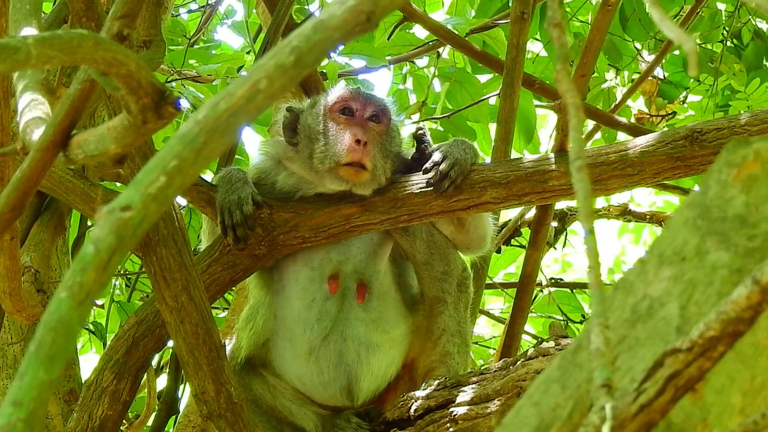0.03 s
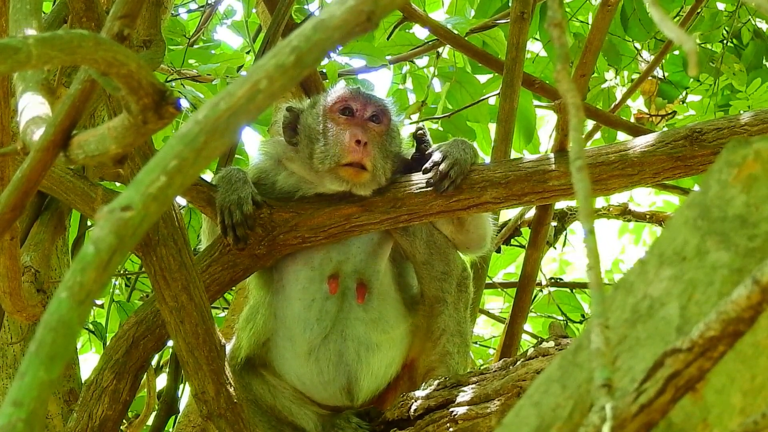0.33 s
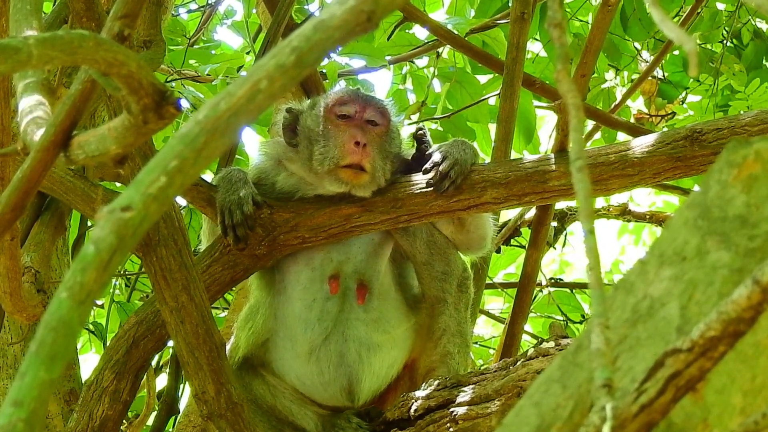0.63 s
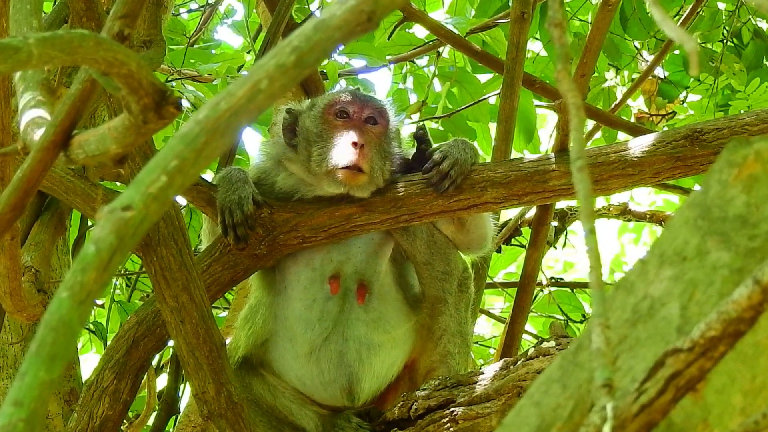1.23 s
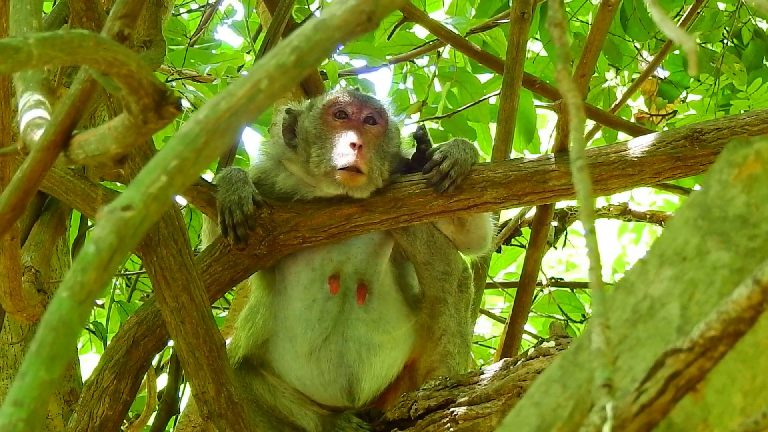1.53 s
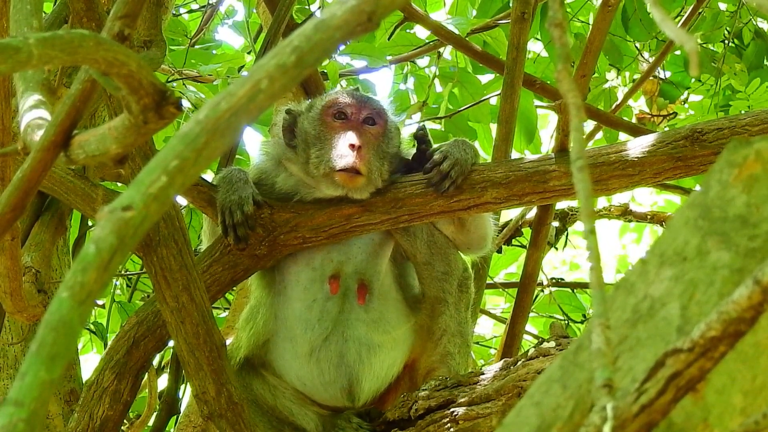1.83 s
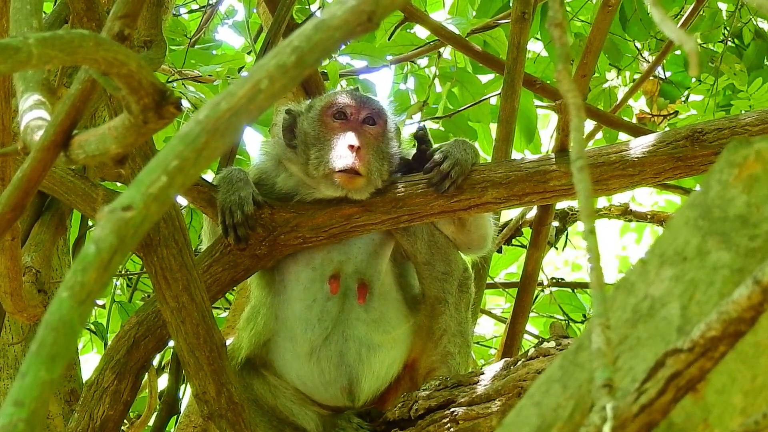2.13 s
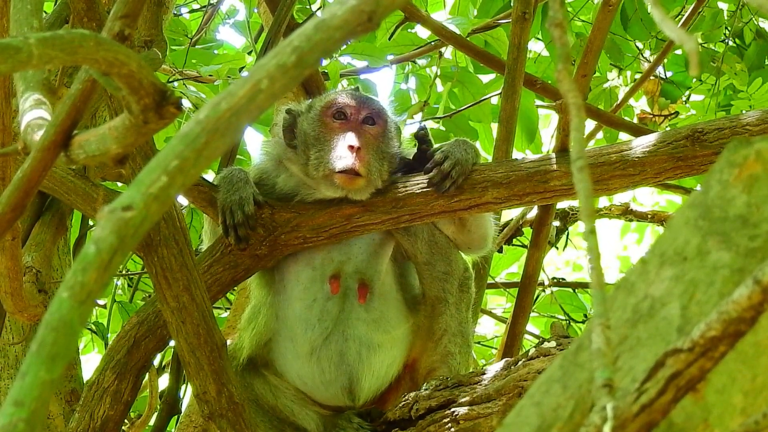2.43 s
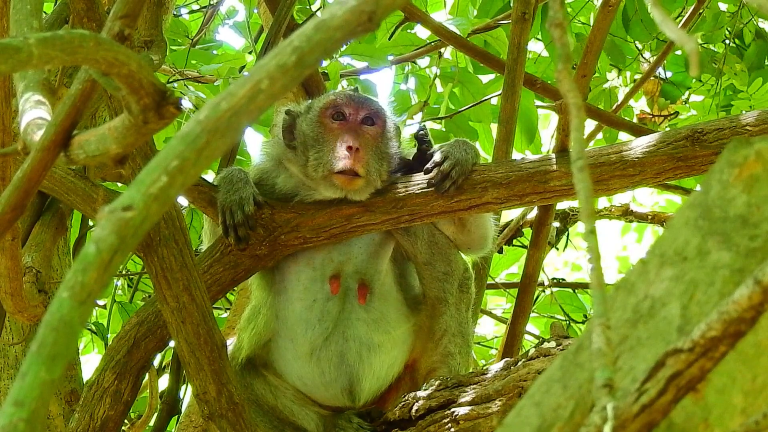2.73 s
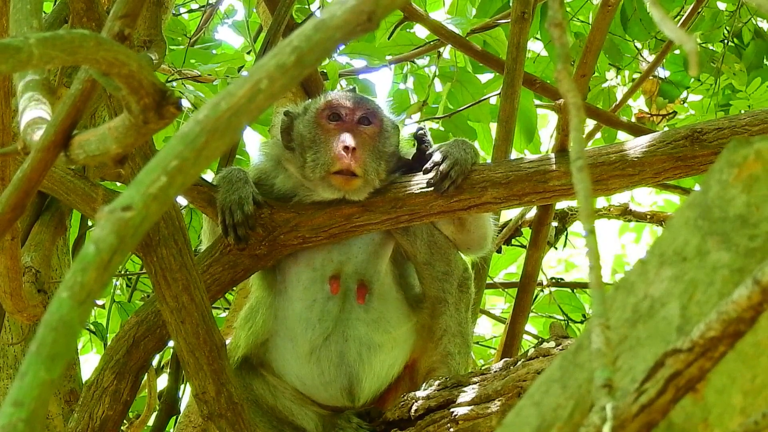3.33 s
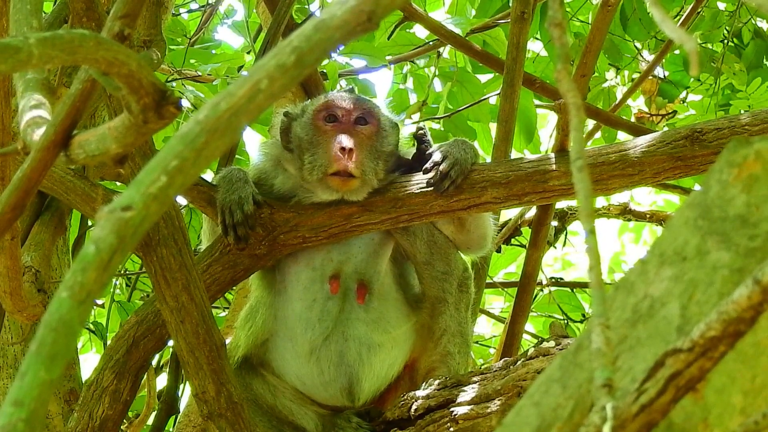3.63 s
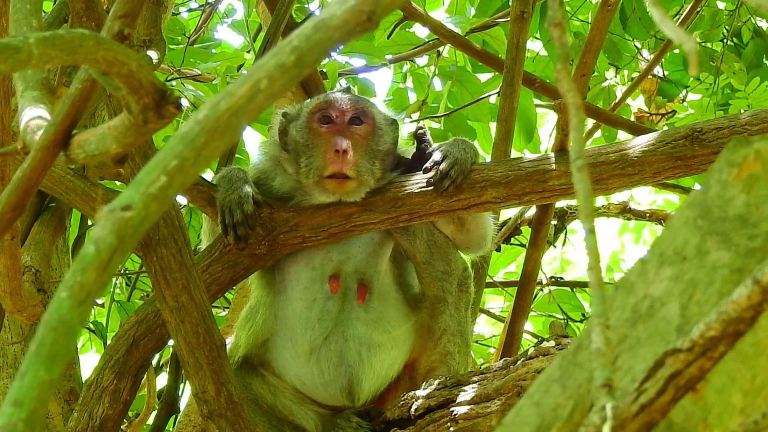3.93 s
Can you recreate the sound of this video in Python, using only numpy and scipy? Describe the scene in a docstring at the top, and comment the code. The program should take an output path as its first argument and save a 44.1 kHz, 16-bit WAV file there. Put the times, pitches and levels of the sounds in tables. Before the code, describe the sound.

A bird repeats a low two-note hoot about twice a second, echoing among trees. Further off, other birds chirp, scold and twice rattle harshly, while a thin insect whine, light leaf rustles and a low rumble surround the microphone.

```python
"""A low two-note hoot repeats among trees, each note an arch in pitch that trunks and canopy throw back.
Around the microphone lie a low outdoor rumble, the hiss of the woods and an insect's wavering whine.
Leaves rustle and twigs tick. Further off, a flock chirps and other birds scold in hoarse bands of
noise, rattle in quick harsh syllables and chatter in slurred notes."""
import sys
import numpy as np
from scipy import signal
from scipy.fft import rfft, irfft, next_fast_len
from scipy.io import wavfile
from scipy.ndimage import uniform_filter1d, map_coordinates

SR = 44100
rng = np.random.default_rng(int(sys.argv[2]) if len(sys.argv) > 2 else 0)


def log_audio(samples):
    """Write samples as a 16-bit WAV file to the path given in sys.argv[1]."""
    # one column per channel
    frames = np.atleast_2d(samples).T
    # limit to full scale, then quantise
    limited = np.clip(frames, -1, 1)
    pcm = np.round(limited * 32767).astype(np.int16)
    wavfile.write(sys.argv[1], SR, pcm)


N = 176400


def amp(db):
    """Decibels to gain."""
    return 10 ** (np.asarray(db) / 20)


def unit(x):
    """Scale to rms 1."""
    return x / np.sqrt(np.mean(x ** 2) + 1e-20)


def along(points, hz):
    """Read (freq_hz, value) points on a log frequency axis."""
    freqs, values = np.transpose(points)
    return np.interp(np.log(hz + 1), np.log(freqs + 1), values)


def clock():
    """Time of every sample in seconds."""
    return np.arange(N) / SR


def wobble(rate):
    """A smooth random curve, rate knots a second."""
    return map_coordinates(rng.standard_normal(int(N * rate / SR) + 4), [clock() * rate])


def filtered(x, response):
    """Shape x by a response of frequency."""
    size = next_fast_len(N + SR // 2)
    return irfft(rfft(x, size) * response(np.fft.rfftfreq(size, 1 / SR)), size)[..., :N]


def delayed(x, seconds):
    """The same sound arriving later."""
    return filtered(x, lambda hz: np.exp(-2j * np.pi * hz * seconds))


WOODS_PAN_DB = -1.4  # most of the wood sits a little right of the microphone
def pan(db):
    """Stereo gains for a level difference, left minus right."""
    return amp([[db / 2], [-db / 2]])


def phase(hz):
    """Running phase of a pitch curve."""
    return 2 * np.pi * np.cumsum(hz) / SR


# Decay under the trees: freq_hz, t60_s
CANOPY_DECAY = [(1000, 1), (2500, 0.85), (8000, 0.52)]
def canopy(x):
    """Leaves and branches scatter a diffuse stereo echo, returned as strong as x."""
    hz, t, spectrum = signal.stft(rng.standard_normal((2, SR)), SR, nperseg=256)
    decay = amp(-60 * t / along(CANOPY_DECAY, hz)[:, None])
    tail = signal.istft(spectrum * decay, SR, nperseg=256)[1]
    echo = signal.fftconvolve(x[None], tail, axes=1)[:, :N]
    return unit(echo) * np.std(x)


# Calls of the nearest bird: first_top_s, gap_s, second_gain_db
HOOT_PAIRS = [(.008, .13, -28.5), (0.4509, 0.14, -26.5), (0.9015, 0.13, -29), (1.3444, 0.12, -29),
              (1.7786, 0.13, -30), (2.2162, .119, -31), (2.6466, .123, -29.5), (3.0752, .119, -29.5),
              (3.497, 0.12, -30), (3.9222, .11, -29)]
# Arch of each note: from_top_ms, pitch_ratio, gain_db
FIRST_ARCH = [(-50, .6, -36.5), (-36, .74, -16), (-24, .79, -14.5), (-11, .861, -1), (-2.5, 1.029, -6.5),
              (3.5, .955, -4.5), (12.5, .832, -3.5), (26, .734, -12.5), (37.5, 0.645, -19.5)]
SECOND_ARCH = [(-38, 0.572, -26.5), (-24, .777, -9), (-9, .821, -5.5), (0, .902, -3.5), (8, .826, -12.5),
               (15, 0.779, -5.5), (29.5, 0.606, -30)]
# Throat colour on the overtone: freq_hz, gain_db
THROAT_COLOUR = [(2000, 2), (2450, -10.5)]
# Reflections from trunks to microphone: delay_ms, left_gain, right_gain
TRUNK_ECHOES = [(7.035, -0.45, -0.55), (11.236, -0.2, 0.31), (29.1, 0.18, 0.12), (43.97, 0.23, 0.084)]
def hoots(pitch_hz=1239, first_gain_db=-29.5, overtone_db=-27):
    """Pairs of arched, almost pure notes beat against their reflections from the trunks."""
    t, voice, overtone = clock(), np.zeros(N), np.zeros(N)
    for first_s, gap_s, second_gain_db in HOOT_PAIRS:
        notes = (first_s, FIRST_ARCH, first_gain_db), (first_s + gap_s, SECOND_ARCH, second_gain_db)
        for top_s, arch, note_db in notes:
            ms, ratio, arch_db = np.transpose(arch)
            from_top_ms = (t - top_s) * 1000
            on = (from_top_ms > ms[0]) & (from_top_ms < ms[-1])
            angle = phase(pitch_hz * rng.normal(1, 0.0074) * np.interp(from_top_ms[on], ms, ratio))
            swell = amp(np.interp(from_top_ms[on], ms, arch_db))
            voice[on] += amp(note_db) * swell * np.sin(angle)
            overtone[on] += amp(note_db + overtone_db) * swell ** .25 * np.sin(2 * angle)
    voice += filtered(overtone, lambda hz: amp(along(THROAT_COLOUR, hz)))
    trunks = sum(np.array([[left], [right]]) * delayed(voice, ms / 1000)
                 for ms, left, right in TRUNK_ECHOES)
    return pan(-1.5) * (voice + trunks + amp(-4.5) * canopy(voice))


# Likeness of the microphone's two sides: freq_hz, correlation
STEREO_LIKENESS = [(70, 0.99), (150, 0.9), (400, 0.38), (6000, 0.27)]
def noise(colour):
    """Stereo noise of rms 1, alike in the bass and mostly unrelated in the treble."""
    def mid_and_side(hz):
        turn = np.arccos(np.clip(along(STEREO_LIKENESS, hz), -1, 1)) / 2
        return amp(along(colour, hz)) * [np.cos(turn), np.sin(turn)]
    mid, side = filtered(rng.standard_normal((2, N)), mid_and_side)
    return unit(np.array([mid + side, mid - side]))


def patchy(x, drift_db=1.1):
    """Each region of the spectrum drifts slowly in level."""
    spectrum = signal.stft(x, nperseg=512)[2]
    across_pitch = uniform_filter1d(rng.standard_normal(spectrum.shape[1:]), size=10, axis=0)
    drift = unit(uniform_filter1d(across_pitch, size=28, axis=1))
    return signal.istft(spectrum * amp(drift_db * drift), nperseg=512)[1][:, :N]


# Colours of the rumble and the hiss: freq_hz, gain_db
RUMBLE_COLOUR = [(20, -23), (32, -16), (56, 2), (72, -9.5), (100, -15), (138, -8), (160, -16.5),
                 (400, -38.5), (3000, -115)]
HISS_COLOUR = [(1200, 1.5), (3500, -5), (5200, -0.5), (6800, -0.5), (8200, -12.5), (10500, -16.5),
               (15500, -19)]
# Course of the hiss: time_s, level_db
HISS_LEVEL = [(1.9, -57.5), (2.8, -57), (3.6, -59)]
def rumble_and_hiss(rumble_db=-43, swell_db=2):
    """A low distant rumble and the drifting hiss of the woods surround the microphone."""
    rumble = amp(rumble_db + swell_db * wobble(6.32)) * noise(RUMBLE_COLOUR)
    hiss = amp(np.interp(clock(), *np.transpose(HISS_LEVEL))) * patchy(noise(HISS_COLOUR))
    return pan(WOODS_PAN_DB) * (rumble + hiss)


# Partials of the insect's whine: pitch_hz, swing_hz, level_db
WHINE_PARTIALS = [(7585, 117.8, -63.5), (7050, 62.4, -70.5)]
def insect(waver_hz=12.3, right_lag_s=0.00016):
    """A thin whine flips up and down in pitch, reaching the microphone more as echo than direct."""
    flips = np.tanh(2 * np.sin(phase(waver_hz * (1 + .2 * wobble(8)))))
    swing = flips + 0.258 * wobble(250)
    voice = sum(amp(db) * np.sin(phase(hz + swing_hz * swing)) for hz, swing_hz, db in WHINE_PARTIALS)
    direct = np.array([voice, delayed(voice, right_lag_s)])
    return pan(WOODS_PAN_DB) * (direct + amp(4.5) * canopy(voice))


# Course of the distant flock: time_s, level_db
FLOCK_LEVEL = [(.2, -56), (.8, -55.5), (1.2, -59.5), (2.05, -55.5), (3.7, -63)]
def flock(count=260, centre_hz=2226, log_spread=0.2472, chirp_s=0.01943):
    """Many gliding chirps, far off, blur into one another under the canopy."""
    chirps, progress = np.zeros(N + SR), np.linspace(0, 1, int(chirp_s * SR))
    for k, (jitter, pitch, glide) in enumerate(rng.uniform(-1, 1, (count, 3))):
        hz = centre_hz * np.exp(log_spread * (pitch + glide * (progress - .5)))
        start = int(abs(k + jitter) * N / count)
        chirps[start:start + len(progress)] += np.sin(np.pi * progress) * np.sin(phase(hz))
    level = amp(np.interp(clock(), *np.transpose(FLOCK_LEVEL)))
    return level * pan(WOODS_PAN_DB) * unit(.5 * chirps[:N] + canopy(chirps[:N]))


# Brushes of the leaves: start_s, level_db
LEAF_BRUSHES = [(0.133, -51.5), (.46, -55.5), (1.51, -53.5), (2.444, -55), (2.883, -46), (3.911, -53)]
# Colour of the leaves: freq_hz, gain_db
LEAF_COLOUR = [(4000, -6.5), (6600, 2), (9500, -14.5), (15000, -29)]
def leaves(rise_s=0.0036, t60_s=0.6, grain_db=2.5):
    """Brushed leaves send a short grainy hiss straight to the microphone."""
    t = clock()
    brush = sum(amp(db - 60 * np.abs(t - start_s) / t60_s) * np.clip((t - start_s) / rise_s, 0, 1)
                for start_s, db in LEAF_BRUSHES)
    grains = unit(noise(LEAF_COLOUR) * amp(grain_db * wobble(600)))
    return pan(-1.1) * brush * grains


# Scolding from off in the trees: middle_s, half_length_s, centre_hz, level_db
SCOLD_CALLS = [(0.768, 0.15, 2220, -50), (1.281, 0.037, 4230, -58), (1.387, .07, 3390, -54),
               (2.103, 0.035, 2670, -52.5), (3.2, 0.03, 3100, -54.5), (3.95, 0.095, 3380, -52)]
def scolds(log_width=0.15, flutter_hz=70, flutter_db=2.5):
    """Hoarse, fluttering bird calls, each a swell of noise in one resonance."""
    t, voice = clock(), np.zeros(N)
    flutter = amp(flutter_db * np.sin(phase(flutter_hz * (1 + 0.1974 * wobble(30)))))
    for middle_s, half_length_s, centre_hz, db in SCOLD_CALLS:
        resonance = lambda hz: np.exp(-.5 * (np.log((hz + 1) / centre_hz) / log_width) ** 2)
        band = filtered(rng.standard_normal(N), resonance)
        swell = amp(db) * np.exp(-((t - middle_s) / half_length_s) ** 2)
        voice += swell * unit(band * flutter)
    return pan(WOODS_PAN_DB) * (voice + amp(-1) * canopy(voice))


# Ticks of the twigs: start_s, gain_db
TWIG_TICKS = [(0.8701, -33), (0.981, -42)]
# Colour of a tick: freq_hz, gain_db
TWIG_COLOUR = [(2000, -19), (5500, 8.5), (7000, 3.5), (15000, -36)]
def twigs(t60_s=0.0092):
    """Twigs tick in sharp bursts of bright noise that echo in the branches."""
    t = clock()
    snap = sum(amp(db - 60 * np.abs(t - start_s) / t60_s) * (t >= start_s) for start_s, db in TWIG_TICKS)
    ticks = 2 * filtered(snap * rng.standard_normal((2, N)), lambda hz: amp(along(TWIG_COLOUR, hz)))
    return pan(-1.1) * (ticks + amp(-6) * canopy(ticks[0]))


# Syllables of a bird further off: top_s, level_db, top_pitch_hz
RATTLE_SYLLABLES = [(1.315, -41, 2950), (1.359, -36, 2805), (1.384, -37.5, 2667), (1.411, -38.5, 3450),
                    (1.44, -34.5, 2690), (1.467, -35.5, 2617), (1.499, -31.5, 2790), (1.519, -33, 2836),
                    (1.539, -32, 2813), (2.693, -43.5, 3370), (2.715, -41.5, 3000), (2.731, -37, 3080),
                    (2.749, -38, 2956), (2.772, -33.5, 2950), (2.796, -33, 2896), (2.823, -33.5, 2886),
                    (2.853, -32.5, 3020), (2.875, -30, 2850), (2.903, -31.5, 2748), (2.933, -36, 2743),
                    (2.952, -31.5, 2750), (2.973, -33, 2704), (2.991, -32, 2708), (3.857, -46, 2780),
                    (3.888, -42, 2960), (3.902, -39, 3050), (3.918, -38.5, 2980), (3.931, -35.5, 2950)]
# Colour of its rasp: freq_hz, gain_db
RASP_COLOUR = [(2400, -15), (3500, 2), (7000, -20), (12000, -60)]
def rattles(width_s=.005, pitch_drop=0.2002, rasp_db=-15.5, right_lag_s=7e-5):
    """Quick runs of rasping syllables: each flicks up in pitch and fades as it falls back."""
    t, voice, effort = clock(), np.zeros(N), np.zeros(N)
    rough = 1 + 0.03 * wobble(900)
    for top_s, db, hz in RATTLE_SYLLABLES:
        on = abs(t - top_s) < 4 * width_s
        from_top = (t[on] - top_s) / width_s
        swell = amp(db) / np.cosh(1.61 * from_top + .5)
        arch = 1 - pitch_drop * from_top ** 2 / (1 + from_top ** 2)
        voice[on] += swell * np.sin(phase(hz * rough[on] * arch))
        effort[on] += swell
    rasp = unit(np.sqrt(effort) * noise(RASP_COLOUR)[0])
    voice += amp(rasp_db) * np.std(voice) * rasp
    direct = np.array([voice, delayed(voice, right_lag_s)])
    return pan(WOODS_PAN_DB) * (direct + amp(-3) * canopy(voice))


# Notes from deeper in the trees: start_s, length_s, start_hz, end_hz, level_db
CHATTER_NOTES = [(2.21, 0.051, 1900, 1540, -51), (2.307, 0.074, 1650, 2057, -49.5),
                 (3.176, 0.019, 2880, 2400, -44), (3.463, 0.07, 1997, 1980, -44)]
def chatter():
    """Far birds slur their notes, slightly hoarse from a fast jitter in pitch."""
    t, voice = clock(), np.zeros(N)
    rough = 1 + 0.034 * wobble(500)
    for start_s, length_s, start_hz, end_hz, db in CHATTER_NOTES:
        on = (t > start_s) & (t < start_s + length_s)
        progress = (t[on] - start_s) / length_s
        hz = rough[on] * (start_hz + (end_hz - start_hz) * progress)
        voice[on] += amp(db) * np.sin(np.pi * progress) ** .5 * np.sin(phase(hz))
    return voice + amp(-2) * canopy(voice)


def scene():
    """The wood as heard from one spot among the trees."""
    return (hoots() + rumble_and_hiss() + insect() + flock()
            + leaves() + scolds() + twigs() + rattles() + chatter())


def record(dry):
    """The camera's microphone keeps nothing above its band limit."""
    return filtered(dry, lambda hz: hz < 15730)


dry = scene()
out = record(dry)
log_audio(out)
```